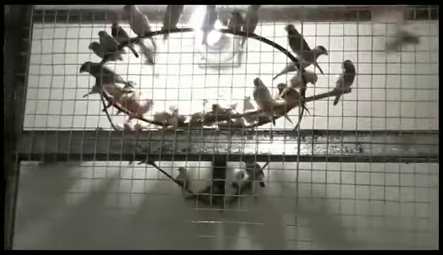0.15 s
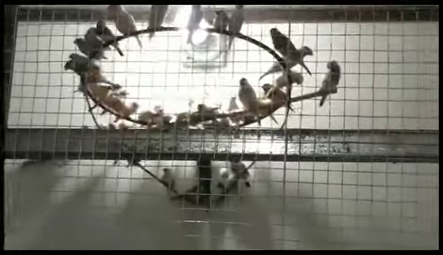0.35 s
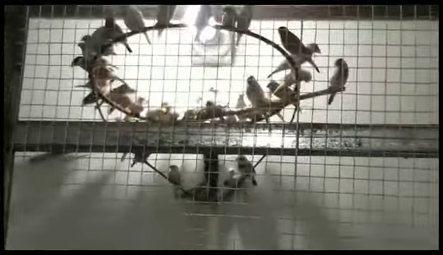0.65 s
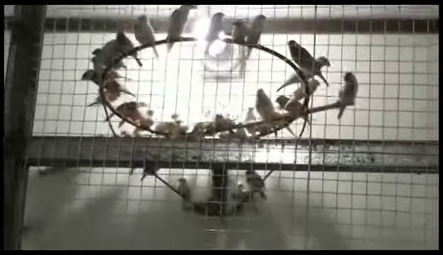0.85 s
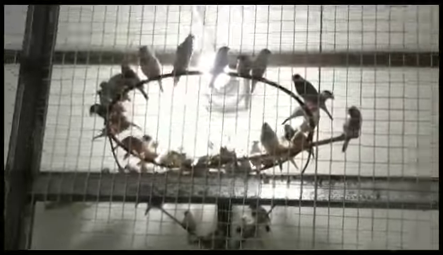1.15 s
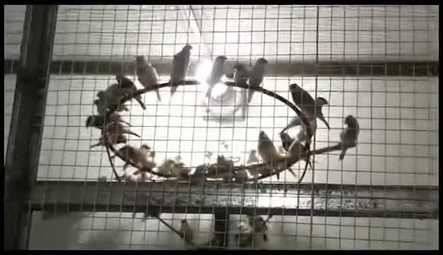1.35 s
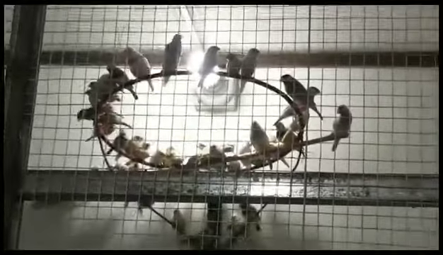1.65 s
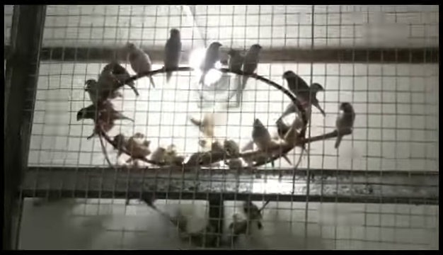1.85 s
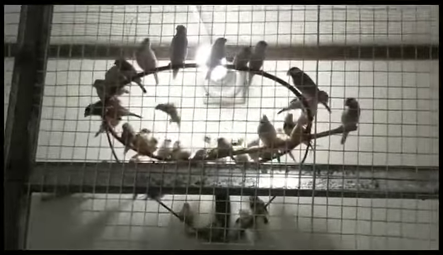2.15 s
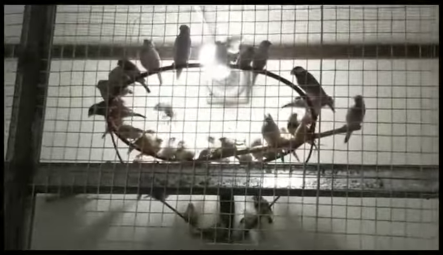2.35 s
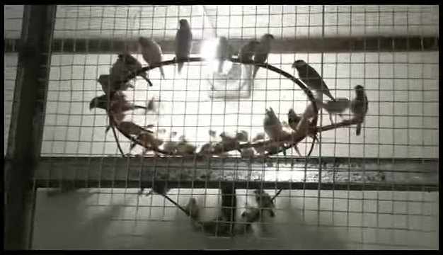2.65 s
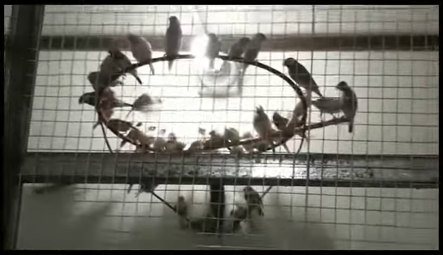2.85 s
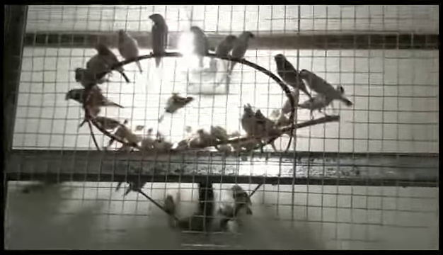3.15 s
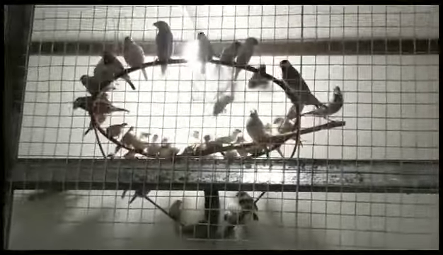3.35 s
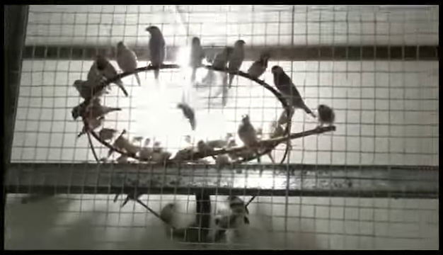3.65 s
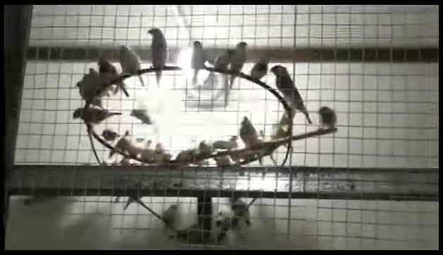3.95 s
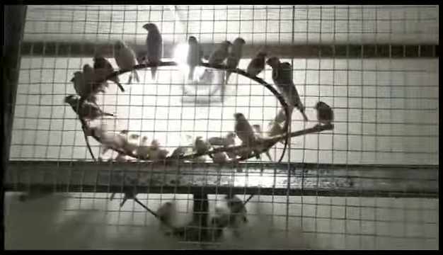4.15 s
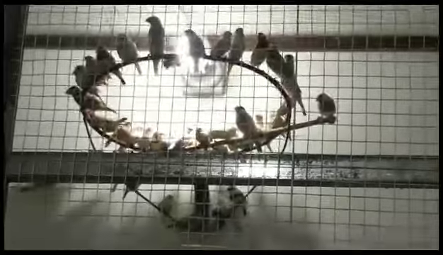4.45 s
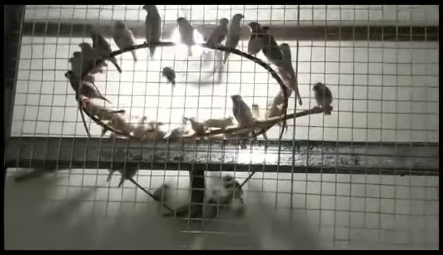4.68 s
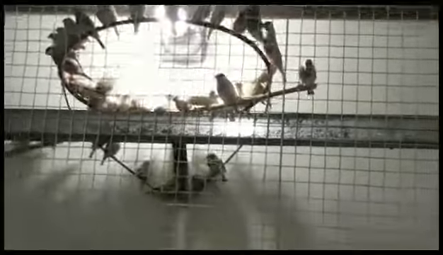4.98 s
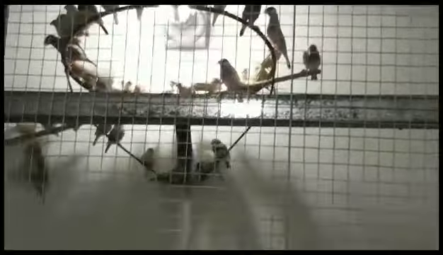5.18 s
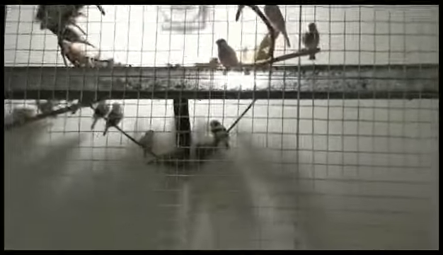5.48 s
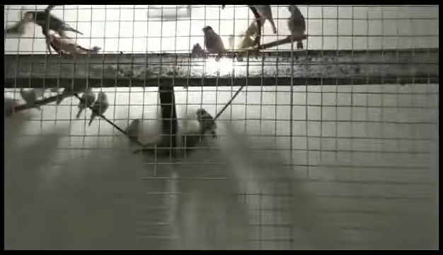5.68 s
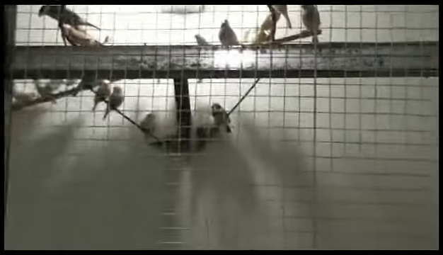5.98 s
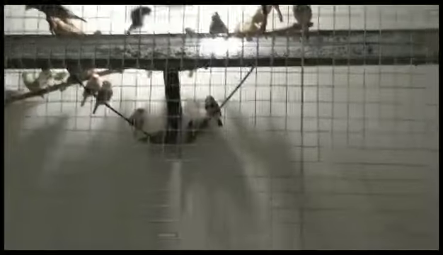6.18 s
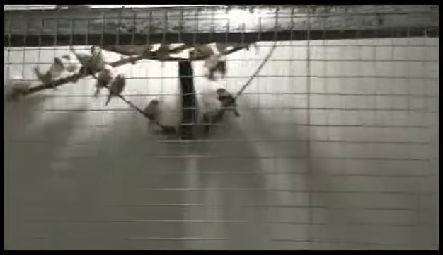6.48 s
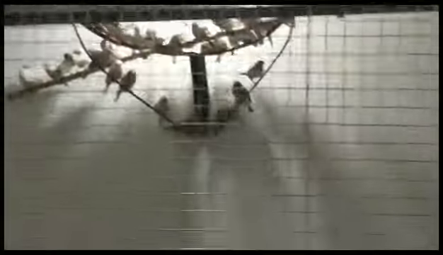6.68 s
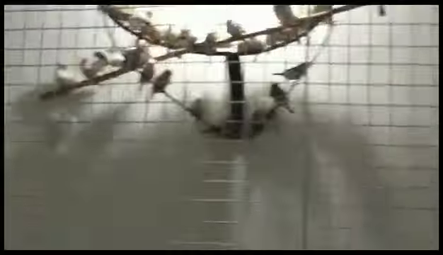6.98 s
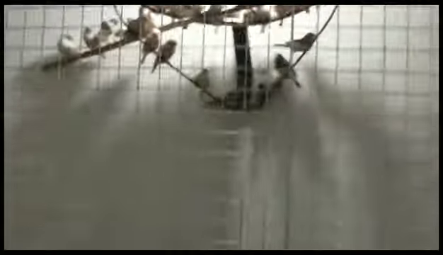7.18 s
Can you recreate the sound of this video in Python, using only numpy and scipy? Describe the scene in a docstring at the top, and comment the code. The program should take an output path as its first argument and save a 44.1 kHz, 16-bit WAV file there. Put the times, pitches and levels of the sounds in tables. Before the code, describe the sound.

Dense, bright bird chatter fills a hard-walled room: rough sparrow chirps, buzzy calls and peeps, with faint air hum and soft microphone bumps.

```python
"""A flock of finches and sparrows chatters in a hard-walled indoor aviary, over the soft twitter of more birds.
Chirps are stacks of harmonics; peeps, buzzes and quick upward tsips are whistles with one octave overtone.
Gliding, trembling pitch makes the notes rough, and decaying noise stands for the room's dense echoes.
Shaped noise and wavering tones make a faint rush of air and hum.
Filtered clicks make two soft bumps on the microphone, the first of them a double knock."""
import sys
import numpy as np
from scipy import signal
from scipy.fft import rfft, irfft
from scipy.io import wavfile
from scipy.ndimage import uniform_filter1d, minimum_filter1d

SR = 44100
rng = np.random.default_rng(int(sys.argv[2]) if len(sys.argv) > 2 else 0)


def pcm_store(signal):
    """Save signal as 16-bit PCM."""
    levels = np.round(np.clip(np.atleast_2d(signal), -1, 1) * 32767)
    wavfile.write(sys.argv[1], SR, levels.astype(np.int16).T)


N = 323253

# what throat and beak let through: (frequency [Hz], level [dB])
BEAK_COLOUR = [(1600, -15.5), (2200, -10), (3000, -6.5), (4000, 0.5), (4900, 4), (7000, -1.5), (8600, -9.5),
               (9900, -29), (12500, -13.5), (15500, -24)]


def from_db(db):
    """Turn decibels into a gain."""
    return 10 ** (np.asarray(db) / 20)


def rms_one(x):
    """Scale a signal to unit power."""
    return x / np.sqrt(np.mean(x ** 2) + 1e-20)


def at_hz(points, hz):
    """Read a table between its points, along a log-frequency axis."""
    known_hz, values = np.transpose(points)
    return np.interp(np.log(hz), np.log(known_hz), values)


def low_pass(x, hz):
    """Soften a signal above hz with a second-order filter."""
    return signal.sosfilt(signal.butter(2, min(hz, SR / 2 - 1), fs=SR, output="sos"), x)


def add(track, s, sound):
    """Mix a sound into a track at time s, in seconds."""
    start = int(np.clip(s * SR, 0, N))
    track[start:start + len(sound)] += sound[:N - start]


def ventilation(air_db=-39, waver=0.44, waver_hz=3):
    """Moving air is shaped noise; the hum is a few tones whose level and phase waver slowly."""
    # colour of the moving air: (frequency [Hz], relative level per Hz [dB])
    air_colour = [(30, -42), (95, -3), (1100, -3), (2200, 2.5), (10000, -18), (15000, -14.5)]
    # hum tones: (frequency [Hz], rms level before the waver [dB])
    hum = [(220, -62), (367, -57), (517, -57.5)]
    t = np.arange(N) / SR
    hz = np.linspace(1, SR / 2, N // 2 + 1)
    noise_spectrum = rfft(rng.standard_normal(N))
    air = irfft(noise_spectrum * from_db(at_hz(air_colour, hz)), N)
    out = from_db(air_db) * rms_one(air)
    for tone_hz, db in hum:
        sway = rms_one(low_pass(rng.standard_normal(N), waver_hz))
        tone = np.sqrt(2) * np.sin(2 * np.pi * tone_hz * t + sway)
        out += from_db(db) * (1 + waver * sway) * tone
    return out


def bumps(dull_hz=480, low_hz=55):
    """A knock reaches the microphone through its housing as a click without treble or deep bass."""
    # soft bumps on the microphone: (time [s], peak level [dB])
    knocks = [(3.757, -21), (3.771, -18.5), (6.66, -22)]
    out = np.zeros(N)
    knock = low_pass(signal.unit_impulse(SR // 10), dull_hz)
    knock = signal.sosfilt(signal.butter(2, low_hz, "high", fs=SR, output="sos"), knock)
    for s, db in knocks:
        add(out, s, from_db(db) * knock / knock.max())
    return out


def twitter(voice, db, centre_hz, octaves, length, rasp, glide_octaves=0.198, count=170):
    """Many more birds give short calls at scattered pitches, spread over the whole scene."""
    out = np.zeros(N)
    for turn, (late, high, bend, long) in enumerate(rng.standard_normal((count, 4))):
        s = (turn + late / 2) / count * N / SR
        hz = centre_hz * 2 ** (octaves * np.clip(high, -2, 2))
        note_length = length * 2 ** np.tanh(long)  # half to twice the usual length
        rise_octaves = glide_octaves * np.tanh(bend)
        add(out, s, voice(note_length, hz, at_hz(BEAK_COLOUR, hz), rise_octaves, rasp))
    return from_db(db) * rms_one(out)


def joining_in(louder_birds, follows=.55, response_s=.06):
    """Gain of the softer birds, which twitter harder whenever the louder ones call."""
    keep = np.exp(-1 / (response_s * SR))
    call_power = rms_one(louder_birds) ** 2
    loudness = np.sqrt(signal.lfilter([1 - keep], [1, -keep], call_power))
    return loudness ** follows


def syrinx(length, start_hz, end_hz, rasp, jitter_hz=280, warble_hz=120):
    """The voice organ gives one note as (phase, swell): an arched glide roughened by warble and jitter."""
    t = np.arange(int(np.clip(length * SR, 20, SR // 2))) / SR
    along = t / t[-1]
    arch = np.abs(np.sin(np.pi * along))
    # the end of a longer noise, where the filter has settled
    jitter = rms_one(low_pass(rng.standard_normal(SR // 2), jitter_hz))[-len(t):]
    # each note warbles at its own rate around warble_hz
    note_warble_hz = warble_hz * 2 ** rng.uniform(-1, 0.504)
    warble = np.sin(2 * np.pi * (note_warble_hz * t + rng.random()))
    waver = rms_one(jitter + warble)
    # harsh notes pulse in level, some twenty to forty times a second
    pulse = np.cos(2 * np.pi * rng.uniform(20, 40) * t)
    stutter_db = 80 * min(rasp, .08) * pulse
    # pitch rises with the air pressure, so the arch that swells the note also lifts its pitch
    glide = start_hz + (end_hz - start_hz) * along
    pitch = glide * (1 + rasp * (waver + arch - arch.mean()))
    swell = arch ** .25 * from_db(stutter_db - 3.5 * along)
    return 2 * np.pi * np.cumsum(pitch) / SR, rms_one(swell)


def whistle(length, start_hz, end_hz, db, rasp, overtone_db=-7, count=2):
    """A nearly pure note with a weak octave, which the beak dulls further on high notes."""
    # rasp is given for a 5000 Hz note; its share of the pitch grows on low notes, which sound rougher
    phase, swell = syrinx(length, start_hz, end_hz, rasp * (5000 / start_hz) ** .75)
    k = np.arange(1, count + 1)[:, None]
    colour = at_hz(BEAK_COLOUR, k * (start_hz + end_hz) / 2)
    # db sets the octave before the beak dulls it; the main tone stands 7 dB higher
    gains = from_db(db + np.minimum(colour - colour[0], 0) + overtone_db * (k - 2))
    return swell * np.sum(gains * np.sin(k * phase), axis=0)


def tsip(length, db):
    """A smooth whistle flicked upward, always over the same sweep."""
    return whistle(length, start_hz=6930, end_hz=8460, db=db, rasp=0)


def buzz(length, hz, db, rise_octaves, rasp=.045):
    """A harsh whistle that slides through its pitch."""
    half_rise = 2 ** (rise_octaves / 2)
    return whistle(length, hz / half_rise, hz * half_rise, db, rasp)


def peep(length, hz, db, rasp=.0135, sag_octaves=.035):
    """A clear whistle that sags a little as it is held."""
    half_sag = 2 ** (sag_octaves / 2)
    return whistle(length, hz * half_sag, hz / half_sag, db, rasp)


def chirp(length, start_hz, end_hz, db, rasp, bright_db, count=6):
    """A stack of harmonics, coloured by the beak, which favours the second one."""
    phase, swell = syrinx(length, start_hz, end_hz, rasp)
    k = np.arange(1, count + 1)[:, None]
    glide = np.linspace(start_hz, end_hz, len(phase))
    # weakens the first harmonic and lifts those above the second
    tilt_db = bright_db * np.minimum(np.log2(k / 2), 1)
    gains = from_db(db + at_hz(BEAK_COLOUR, k * glide) + tilt_db)
    # harmonics above the second come in only as the note swells
    arch = np.sin(np.linspace(0, np.pi, len(phase))).clip(0)
    bloom = arch ** (np.maximum(k - 2, 0) / 4)
    return swell * np.sum(bloom * gains * np.sin(k * phase), axis=0)


def sparrow(length, hz, db, rise_octaves, rasp, bright_db=1.5):
    """A chirp that slides through its pitch."""
    half_rise = 2 ** (rise_octaves / 2)
    return chirp(length, hz / half_rise, hz * half_rise, db, rasp, bright_db)


def sing(table, voice):
    """Play every call of a table with one kind of voice."""
    out = np.zeros(N)
    for s, *note in table:
        add(out, s, voice(*note))
    return out


def aviary(x, direct_db, build_s=0.0015):
    """Hard walls add dense echoes whose treble dies first; total power is roughly kept."""
    # the room's ring: (frequency [Hz], time to fade by 60 dB [s])
    ring = [(2200, 0.85), (4800, 0.77), (13000, 0.38)]
    ring_hz, fade_s = np.transpose(ring)
    t = np.arange(SR) / SR
    tail = np.zeros(SR)
    white = rfft(rng.standard_normal(SR))
    hz = np.arange(SR // 2 + 1) + 1.0
    # overlapping bands of one noise, each fading at its own rate
    for share, t60 in zip(np.eye(len(ring_hz)), fade_s):
        band = np.interp(np.log(hz), np.log(ring_hz), share)
        tail += irfft(white * band, SR) * from_db(-60 * t / t60)
    tail *= 1 - np.exp(-t / build_s)
    echoes = signal.fftconvolve(x, tail / np.linalg.norm(tail))[:N]
    direct = from_db(direct_db)  # against the echoes
    return (direct * x + echoes) / np.hypot(1, direct)


def microphones(x):
    """Two microphones hear the same sound, but the left is stronger in one narrow band."""
    # left against right: (frequency [Hz], level difference [dB])
    balance = [(1560, 0), (1850, 4), (2450, 0)]
    lean_db = at_hz(balance, np.linspace(1, SR / 2, N // 2 + 1))
    return irfft(rfft(x) * from_db([lean_db / 2, -lean_db / 2]), N)


def scene():
    """Each group of birds sits at its own distance, set by how strong its direct sound is."""
    # levels in these tables come before the voice and the room change them
    # quick upward flicks close by: (time [s], length [s], level [dB])
    tsips = [(6.283, 0.013, -20), (6.552, 0.0073, -24), (6.648, 0.0081, -26), (6.744, 0.0047, -16.5)]
    # harsh buzzing calls: (time [s], length [s], pitch [Hz], level [dB], rise [octaves])
    buzzes = [(0.038, 0.042, 4330, -23.5, -0.0095), (0.145, 0.071, 6150, -28, 0.032),
              (0.28, 0.094, 5960, -18, -0.031), (0.29, 0.11, 7800, -27, -0.03),
              (0.855, 0.096, 6240, -18.5, 0.12), (1.12, 0.052, 5510, -17.5, -.1),
              (1.2, 0.038, 5170, -17.5, 0.12), (1.335, 0.056, 4870, -28, 0),
              (1.522, 0.051, 4420, -17.5, -.3), (1.67, 0.082, 4390, -25.5, 0.085),
              (1.69, 0.055, 6130, -24, 0.11), (1.765, 0.053, 6030, -19, 0.023),
              (1.845, 0.046, 4135, -18, -0.11), (1.965, 0.062, 4610, -21.5, .07),
              (1.98, 0.039, 6160, -22.5, 0.096), (2.205, 0.063, 3286, -25, 0.19),
              (2.66, .1, 2987, -29.5, 0.11), (2.895, 0.046, 5370, -25, -0.13),
              (3.09, .1, 3730, -26.5, 0.28), (3.15, .13, 5320, -22, 0.012),
              (3.28, 0.077, 5840, -18.5, 0.094), (3.64, 0.1, 3895, -26, 0.068),
              (3.638, 0.046, 6240, -15.5, .04), (3.715, .13, 7000, -21, .08),
              (4.13, 0.12, 5470, -25, -0.11), (4.685, .04, 5800, -25, -.15),
              (5.045, .03, 4780, -27.5, 0.043), (5.205, 0.067, 5210, -20, -0.21),
              (5.375, 0.096, 4260, -23, .16), (5.415, .11, 5940, -22, 0.21), (6.16, 0.037, 4530, -20, 0.44),
              (6.187, .018, 6350, -18, .1), (6.3, 0.044, 5300, -18.5, -0.047),
              (6.535, 0.062, 3430, -26, 0.077), (6.76, 0.038, 6510, -21, 0.17),
              (7.245, .09, 4070, -28.5, .4)]
    # clear peeps: (time [s], length [s], pitch [Hz], level [dB])
    peeps = [(0.0, .046, 2290, -27.5), (0.18, 0.041, 4810, -19), (0.235, 0.056, 3124, -29),
             (0.54, 0.047, 4755, -18), (0.856, .05, 5050, -24), (1.03, .04, 2340, -31),
             (1.062, 0.033, 3520, -25.5), (1.125, 0.054, 4250, -21.5), (1.257, .12, 5700, -25),
             (1.335, 0.054, 4160, -23.5), (1.33, 0.041, 8230, -32), (1.505, 0.018, 5500, -16.5),
             (1.755, 0.068, 5410, -23.5), (1.88, 0.053, 3680, -24), (1.945, 0.044, 3205, -31.5),
             (1.96, 0.042, 7430, -28.5), (2.6, 0.054, 3150, -30), (3.025, 0.051, 3580, -29.5),
             (3.105, 0.076, 5875, -26), (3.2, 0.064, 4220, -30.5), (3.43, 0.068, 5190, -23),
             (3.74, 0.15, 4743, -22), (3.965, 0.11, 4950, -14), (4.18, 0.079, 4860, -14),
             (5.143, .11, 2305, -25.5), (5.18, 0.024, 7850, -23), (5.285, 0.081, 3835, -22),
             (5.62, 0.081, 7070, -25), (5.9, 0.073, 3990, -27.5), (6.035, 0.11, 5790, -21.5),
             (6.16, 0.013, 8300, -27.5), (6.283, 0.012, 3650, -23), (6.412, 0.097, 5060, -16),
             (6.557, 0.021, 4040, -17), (6.635, 0.11, 4976, -14.5), (6.63, .11, 3220, -26.5),
             (6.655, .07, 4220, -21.5), (6.81, .035, 4740, -16), (6.995, 0.079, 5090, -19)]
    # chirps: (time [s], length [s], pitch [Hz], level [dB], rise [octaves], rasp [share of pitch])
    chirps = [(0.033, 0.032, 2770, -23, 0.016, 0.016), (0.125, 0.073, 2080, -14.5, 0.072, 0.042),
              (0.275, .13, 2060, -19, 0.015, 0.067), (0.49, 0.042, 2043, -14.5, 0.098, 0.029),
              (0.527, .046, 2330, -14.5, 0.072, 0.034), (0.853, 0.053, 2120, -17.5, 0, 0.038),
              (1.12, 0.057, 2254, -16, -0.047, 0.073), (1.192, 0.032, 2203, -15.5, 0.0025, 0.046),
              (1.485, 0.077, 2570, -18.5, -.1, 0.063), (1.75, 0.044, 2150, -22, -.1, .08),
              (2.118, 0.076, 2300, -16, 0.16, 0.041), (2.225, 0.06, 2526, -13.5, 0.011, 0.079),
              (2.542, 0.084, 2420, -17.5, .1, .022), (2.62, 0.095, 2740, -17.5, .05, 0.058),
              (2.87, .045, 2080, -23, -.2, 0.044), (3.19, 0.22, 2623, -21.5, -0.0055, 0.083),
              (3.39, .08, 2250, -23.5, 0, .1), (3.49, .09, 2053, -26, -0.0033, 0.12),
              (3.712, .26, 2530, -12.5, .26, .026), (4.09, .11, 2634, -20, 0, .06),
              (4.25, 0.078, 2050, -16.5, -.08, 0.07), (4.53, 0.13, 2355, -28.5, 0, 0.041),
              (4.85, .06, 2150, -26, -0.081, 0.14), (5.2, 0.18, 1974, -18.5, 0.0043, 0.067),
              (5.605, 0.17, 2410, -20, 0.14, .018), (5.725, .1, 2646, -17.5, 0.0058, 0.13),
              (5.98, 0.096, 1824, -19.5, -0.042, 0.087), (6.36, .11, 2327, -17.5, 0.14, .016),
              (6.575, 0.098, 2138, -17, 0.01, .018), (6.76, .06, 2260, -14.5, .06, 0.02),
              (6.935, .065, 2255, -17, 0.093, 0.023), (6.985, 0.016, 2432, -11.5, 0.0051, 0.017)]
    birds = aviary(sing(tsips, tsip), direct_db=2.5)
    birds += aviary(sing(buzzes, buzz), direct_db=-4)
    birds += aviary(sing(peeps, peep), direct_db=0.5)
    birds += aviary(sing(chirps, sparrow), direct_db=-3.5)
    flock = twitter(sparrow, db=-26, centre_hz=2200, octaves=.15, length=.04, rasp=.05)
    flock += twitter(buzz, db=-28.5, centre_hz=4000, octaves=.35, length=.025, rasp=.04)
    birds += aviary(flock * joining_in(birds), direct_db=0)
    return microphones(birds + ventilation() + bumps())


def record(dry, ceiling=0.91, size=221, cutoff_hz=15850):
    """A fast limiter (window of size samples) holds the peaks down, then the top is cut steeply."""
    room_left = ceiling / np.maximum(np.abs(dry), ceiling)
    gain = uniform_filter1d(minimum_filter1d(room_left, size), size)
    top_cut = signal.ellip(12, .1, 90, cutoff_hz, fs=SR, output="sos")
    return signal.sosfilt(top_cut, dry * gain)


dry = scene()
out = record(dry)
pcm_store(out)
```